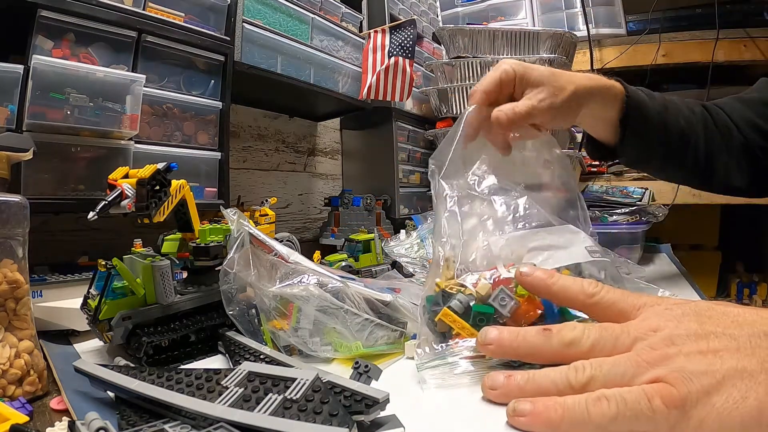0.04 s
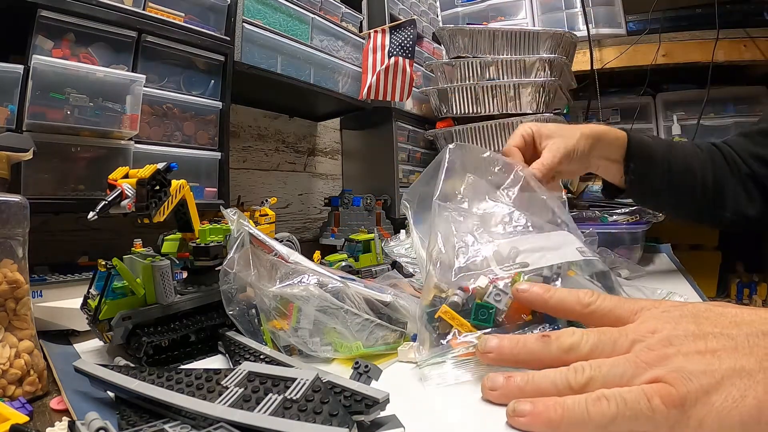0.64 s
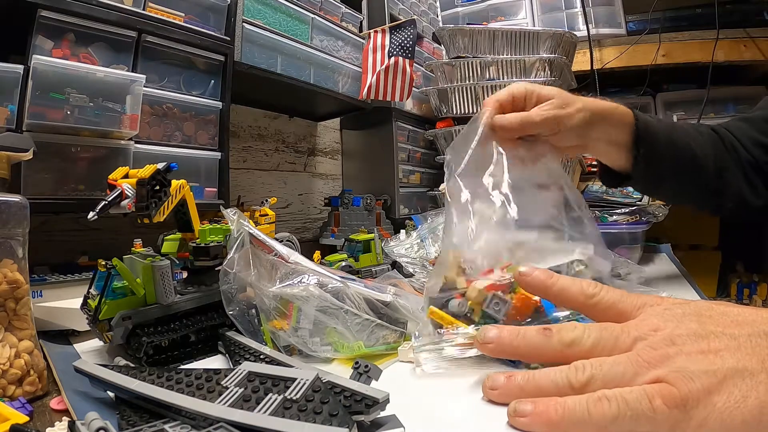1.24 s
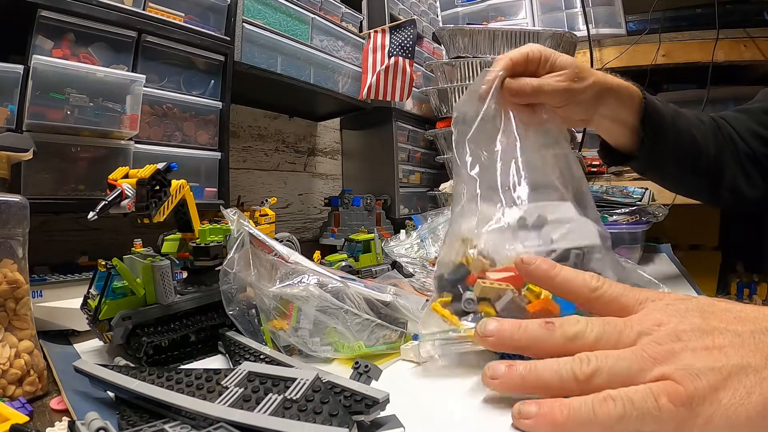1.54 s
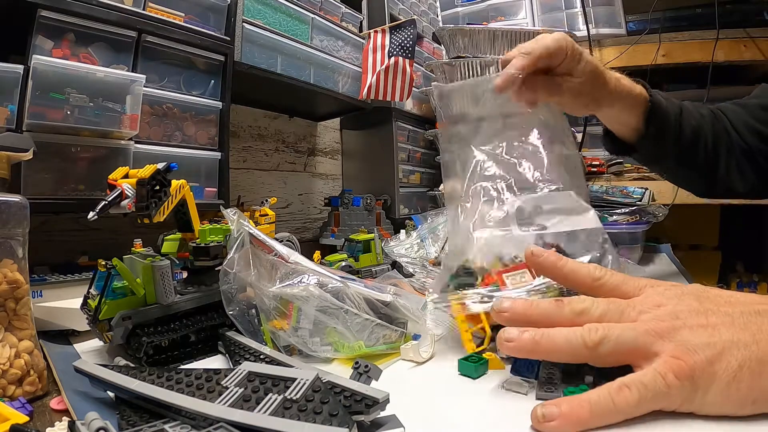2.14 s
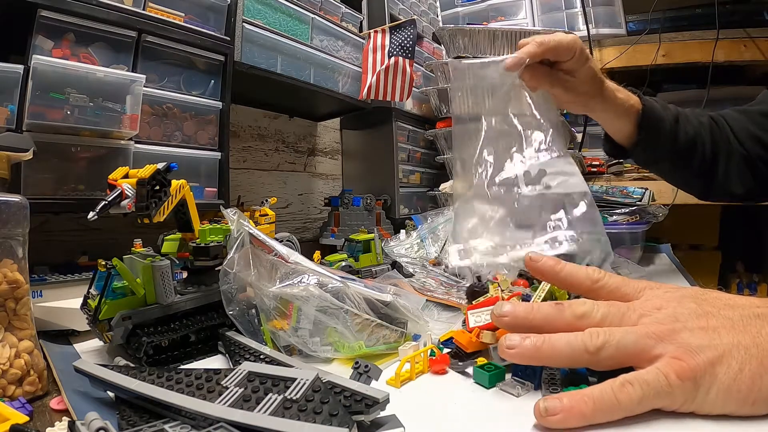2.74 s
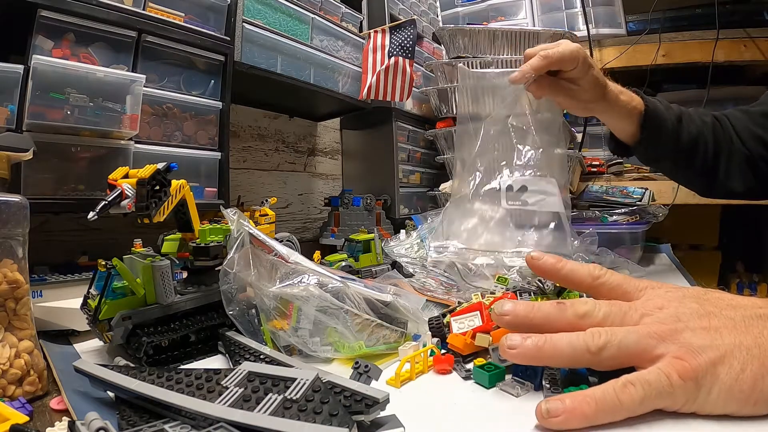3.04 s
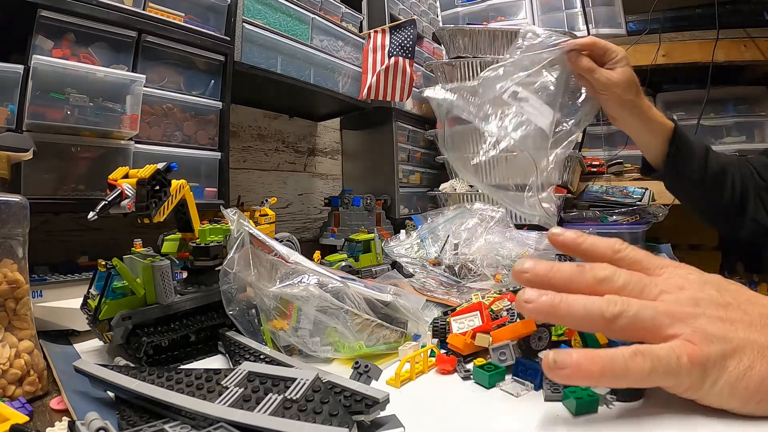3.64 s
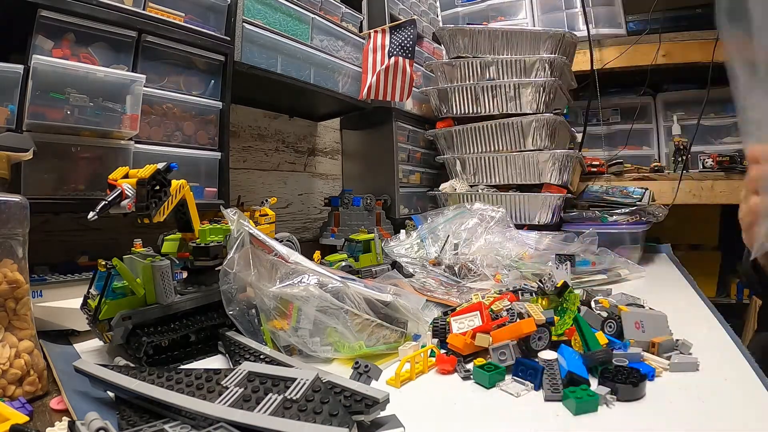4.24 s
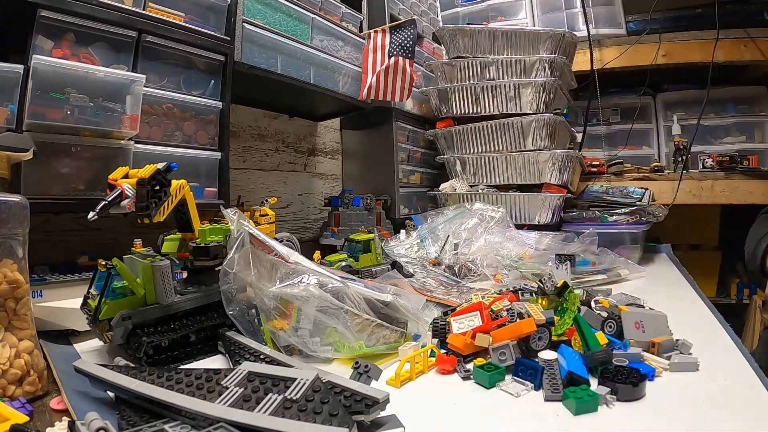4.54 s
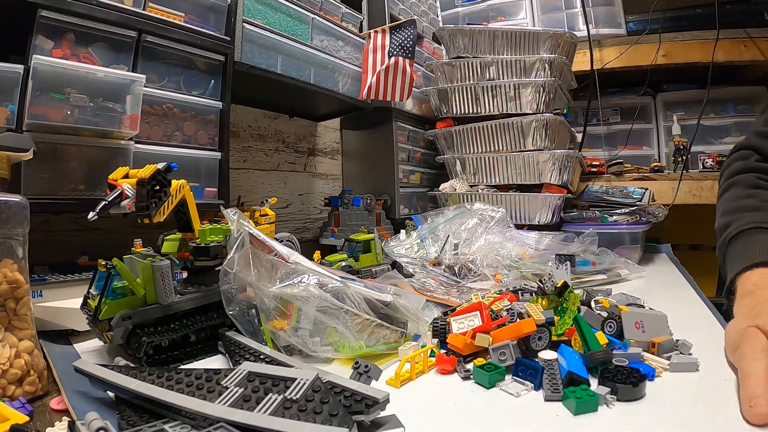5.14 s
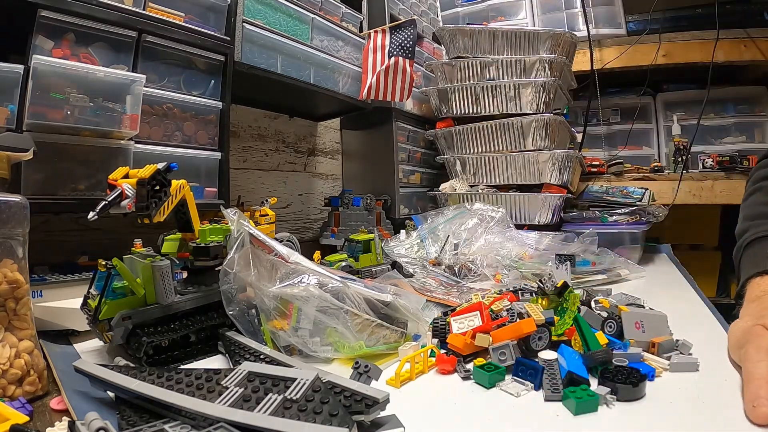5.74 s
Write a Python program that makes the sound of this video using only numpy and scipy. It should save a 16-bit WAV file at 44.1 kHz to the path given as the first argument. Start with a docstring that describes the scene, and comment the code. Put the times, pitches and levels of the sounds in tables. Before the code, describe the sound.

Plastic toy bricks rattle in a bag and clatter onto a tabletop, then the empty bag crinkles and a sleeve slides.

```python
"""Toy bricks shift and click inside a plastic bag, then pour out and clatter onto a tabletop.
Each brick cracks and rings at its wall pitch; the board knocks and rumbles underneath. The empty bag
snaps and crumples as it is put aside, and a sleeved arm slides and bumps along the table.
Stereo microphone close to the table, in a small room crowded with shelves."""
import sys
import numpy as np
from scipy import signal
from scipy.fft import rfft, irfft, next_fast_len
from scipy.io import wavfile
from scipy.ndimage import uniform_filter1d

SR = 44100
rng = np.random.default_rng(int(sys.argv[2]) if len(sys.argv) > 2 else 0)


def store_wav(level_fs):
    """Save 16-bit WAV to argv[1]."""
    pcm = np.round(np.clip(np.atleast_2d(level_fs), -1, 1) * 32767)
    wavfile.write(sys.argv[1], SR, pcm.T.astype(np.int16))


N = 264284
T = np.arange(4096) / SR  # time within one contact


# Tugs on the full bag, clumps shaken out of it, and stray bricks trickling between the clumps:
# t/s, hold/s, clatter level/dB, tabletop/dB re clatter, film/dB re clatter
TUGS = [(0.0, 0.032, -28.5, -8, -4.5), (0.085, 0.038, -29, -5, -8.5), (0.177, 0.05, -35.5, -5, -7.5),
        (0.357, 0.078, -46.5, -3.5, -12), (0.428, 0.042, -34.5, -3, -8.5),
        (0.506, 0.046, -35.5, -3.5, -8.5), (0.606, .0053, -34, 1.5, -14), (0.654, 0.018, -30, -8.5, -19),
        (.715, 0.057, -36, -1, -16), (0.866, 0.054, -38, -2, -29), (0.978, 0.014, -38.5, -2.5, -21),
        (1.023, 0.063, -35.5, -10, -11), (1.169, 0.12, -40, 0.5, -7)]
CLUMPS = [(1.273, 0.043, -27, -5.5, -17), (1.347, 0.045, -24.5, -7.5, -13), (1.416, 0.022, -27, -8, -14),
          (1.52, 0.053, -25.5, -5.5, -9.5), (1.617, 0.034, -30, -6, -17), (1.7, 0.03, -25.5, -5, -18),
          (1.761, 0.042, -29, -3.5, -13.5), (1.87, 0.051, -23.5, -11, -10),
          (1.945, 0.047, -28.5, -7.5, -10.5), (2.055, 0.046, -24, -8.5, -8),
          (2.126, 0.047, -25.5, -4.5, -11.5), (2.194, 0.026, -26.5, -18, -7),
          (2.238, 0.058, -22, -11.5, -7.5), (2.327, 0.041, -27.5, -7, -10),
          (2.405, 0.023, -26.5, -11, -3.5), (2.436, 0.029, -23.5, -9, -7), (2.495, 0.051, -26.5, -6.5, -7),
          (2.598, 0.043, -23.5, -8, -8.5), (2.664, .06, -27.5, -9, -7.5), (2.771, 0.051, -25, -9, -11.5),
          (2.875, 0.021, -28.5, -12.5, -11), (2.947, 0.017, -30.5, -6, -9), (2.972, 0.054, -25, -10, -9),
          (3.058, 0.027, -28, -10, -11), (3.118, 0.082, -30, -9, -11), (3.23, 0.064, -35.5, -10, -13),
          (3.31, .045, -34.5, -5.5, -10), (3.398, 0.032, -39.5, -2, -11)]
TRICKLE = [(1.243, 1.94, -32.5, -5.5, -16.5)]
# Tone of the bricks inside the bag and out in the open: f/Hz, level/dB
BAGGED_TONE = [(880, -54.5), (1500, -10), (2390, -8), (2630, -2), (4230, -8), (4650, -9.5), (5150, -10),
               (7140, -16), (8450, -19), (14000, -38.5)]
LOOSE_TONE = [(940, -13), (1600, -9), (2250, -8), (2500, -3), (2860, -2.5), (3140, -4.5), (3680, -2),
              (4480, -4), (5210, -6.5), (8010, -15), (10100, -21.5), (13000, -28), (15000, -40.5)]
def pour():
    """Close to the microphone, bricks rub in the tugged bag, then spill out and ring more freely."""
    tug_clatter, tug_board, tug_film = swells(TUGS, rise_s=0.023, fall_s=0.045)
    clatter, board, film = swells(CLUMPS + TRICKLE, rise_s=0.012, fall_s=0.036)
    # the heaviest pieces of a clump hit the board first
    first_hits = [(s, 0, db + board_db - 8) for s, _, db, board_db, _ in CLUMPS]
    jolts, = swells(first_hits, rise_s=0.012, fall_s=0.029)
    board = np.hypot(board, jolts)
    inside = heap(tug_clatter, tug_board, tug_film, BAGGED_TONE, hits_per_s=1300, t60=0.03,
                  crack_db=-0.5, film_db=-1.5, crinkles_per_s=900, crinkle_range_db=6)
    spill = heap(clatter, board, film, LOOSE_TONE, hits_per_s=1550, t60=0.036,
                 crack_db=-2.5, film_db=0, crinkles_per_s=1900, crinkle_range_db=2)
    # knocks rumble the board less and less as the load is lifted or the heap cushions them
    weight = tug_board * fade_from(TUGS[0][0], db=-15, db_per_s=15)
    weight += board * fade_from(CLUMPS[0][0], db=-10, db_per_s=8)
    return inside + spill + weight * rumble()


# Tone of a knock on the tabletop and of the film around the bricks: f/Hz, level/dB
KNOCK_TONE = [(60, -40.5), (115, -11), (190, 3), (290, -0.5), (420, 1.5), (700, 1.5), (950, 4), (1300, 3),
              (1700, -2.5), (2400, 0), (4000, -120)]
FILM_TONE = [(40, -12.5), (250, 9.5), (2350, 9), (4000, -49.5), (4660, -34.5), (6400, 6.5), (9360, 4),
             (13000, -9), (15500, -59)]
def heap(clatter, board, film, tone, hits_per_s, t60, crack_db, film_db, crinkles_per_s,
         crinkle_range_db):
    """Bricks strike each other; the same blows knock the tabletop while the film crackles around them."""
    hits = contacts(hits_per_s, range_db=7, flow=clatter)
    bricks = [brick(t60, crack_db) for _ in range(150)]
    spots = [burst(0.035) for _ in range(200)]
    folds = [burst(0.011) for _ in range(60)]
    x = amp(0.1) * clatter * patter(hits, bricks, tone, pan_db=-0.5, width_db=1.5)
    x += board * patter(hits, spots, KNOCK_TONE, pan_db=-2, width_db=3.5)
    crinkles = contacts(crinkles_per_s, crinkle_range_db, flow=film)
    return x + amp(film_db) * film * patter(crinkles, folds, FILM_TONE, pan_db=-3, width_db=7)


# Wall pitches of the common brick sizes: f/Hz
WALL_PITCHES = [2137, 2500, 2602, 2765, 3070, 3150, 3460, 3888, 4410, 4610]
def brick(t60, crack_db):
    """One brick: a sharp crack, its wall mode and five scattered modes, the high ones dying sooner."""
    wall_hz = rng.choice(WALL_PITCHES) * np.exp(0.035 * rng.standard_normal())
    hz = np.append(wall_hz, rng.uniform(1800, 14000, 5))
    mode_t60 = t60 * np.exp(0.3 * rng.standard_normal(len(hz))) * (3000 / hz) ** 0.3
    shell = ring(np.column_stack([hz, rng.normal(0, 4.5, len(hz)), mode_t60]))
    return unit(shell) + amp(crack_db) * unit(burst(0.0066))


# Single hard brick contacts: t/s, crack peak/dB, f/Hz, ring peak/dB
CLACKS = [(0.009, -20, 3144, -17), (0.532, -14, 2680, -24), (0.653, -23, 2930, -20.5),
          (.662, -25, 3040, -19), (0.715, -30, 2560, -24), (.749, -26, 1895, -25), (.756, -25.5, 3110, -24),
          (.835, -23.5, 3060, -29.5), (0.8618, -27, 2760, -30), (1.1705, -21, 2670, -27),
          (1.276, -20.5, 2530, -17), (1.331, -25.5, 6700, -26.5), (1.35, -20, 3930, -19),
          (1.365, -15.5, 2170, -17), (1.398, -15.5, 4479, -20.5), (1.464, -13, 4130, -17),
          (1.47, -17.5, 2960, -17), (1.488, -22, 4490, -13.5), (1.5103, -17.5, 4393, -20),
          (1.567, -18.5, 2830, -20.5), (1.596, -21, 5470, -17.5), (1.627, -23.5, 7430, -25.5),
          (1.713, -14, 4651, -22), (1.749, -23, 8096, -24.5), (1.864, -16, 4080, -22),
          (1.872, -21, 3876, -16), (1.892, -16, 2530, -19), (1.914, -21, 4660, -15),
          (1.958, -17, 3830, -22.5), (2.0324, -11, 3600, -21), (2.075, -17, 4307, -23),
          (2.096, -16.5, 3962, -16.5), (2.122, -20, 2326, -25.5), (2.16, -15, 2730, -19.5),
          (2.164, -19, 6977, -23), (2.24, -18, 2340, -21), (2.294, -23.5, 3400, -15.5),
          (2.301, -24, 3400, -12.5), (2.327, -13.5, 3230, -14), (2.333, -19, 3200, -14.5),
          (2.362, -16, 2480, -18.5), (2.408, -17.5, 4630, -20), (2.44, -17, 2540, -17.5),
          (2.463, -18, 3200, -13.5), (2.509, -14, 3160, -16), (2.518, -14.5, 2490, -19),
          (2.545, -21, 4500, -22), (2.5773, -9, 2650, -21.5), (2.639, -13.5, 3930, -20.5),
          (2.7, -18, 4400, -21), (2.726, -21.5, 2498, -22.5), (2.754, -12.5, 4730, -18),
          (2.76, -18.5, 2540, -19), (2.777, -20, 4737, -21.5), (2.789, -17.5, 2440, -19),
          (2.872, -17.5, 2570, -21), (2.894, -24.5, 3150, -19), (2.939, -14, 2630, -28.5),
          (2.978, -15, 2326, -18), (3.028, -19.5, 4670, -21), (3.084, -19, 3120, -23),
          (3.111, -16, 2584, -22), (3.129, -16.5, 3240, -21), (3.179, -19.5, 2646, -17.5),
          (3.183, -22, 3150, -17.5), (3.257, -27.5, 2460, -24.5), (3.304, -25, 2498, -25.5),
          (3.321, -19.5, 2720, -22.5)]
# Tone of the crack of plastic on plastic: f/Hz, level/dB
CRACK_TONE = [(300, -15), (1200, -7.5), (2400, -0.5), (4400, -4), (6000, -13.5), (9000, -12),
              (15000, -37.5)]
def clacks(t60=0.04, rebound_s=0.0076, rebound_db=-7):
    """The hardest contacts stand out: a dry crack and a ring that repeats as the brick rebounds."""
    x = np.zeros((2, N))
    for s, crack_db, hz, ring_db in CLACKS:
        lower, upper, top = hz * rng.uniform([0.62, 1.1, 1.7], [0.93, 1.5, 2.3])
        modes = [(hz, 0, t60), (lower, -9, t60 * 0.42), (upper, -11, t60 * 0.5), (top, -19, t60 * 0.5)]
        shell = crest(ring(modes))
        add(x, s, amp(crack_db) * crest(colour(scuff(0.0019), CRACK_TONE)))
        add(x, s, amp(ring_db) * shell)
        add(x, s + rebound_s * rng.uniform(0.6, 1.1), amp(ring_db + rebound_db) * shell)
    return x


# One brick's double click: t/s, peak/dB
DOUBLE_CLICK = [(1.003, -14), (1.006, -18)]
# Its free modes: f/Hz, relative level/dB, t60/s
BRICK_MODES = [(2300, -5, 0.03), (2520, -3, 0.04), (3320, -18, .1), (4646, 0, .042), (5512, -10, 0.04),
               (7130, 0, .026), (8190, -7, .04)]
def slipping_brick():
    """One brick slips off an edge, clicks twice and rings freely."""
    x = np.zeros((2, N))
    for s, db in DOUBLE_CLICK:
        add(x, s, amp(db) * crest(colour(scuff(0.0027), CRACK_TONE)))
        add(x, s + 0.0015, amp(db) * crest(ring(BRICK_MODES)))
    return x


# Weight leaning on the table: t/s, hold/s, relative level/dB
LEANS = [(.03, 0.11, -41), (.58, 0.15, -49), (1.0, 0.0146, -46), (1.228, 0.022, -37), (1.725, 0.011, -40),
         (1.886, 0.019, -34), (3.575, 0.043, -49.5), (4.15, 0.13, -57), (4.36, 0.16, -54),
         (4.94, 0.073, -65), (5.108, 0.051, -36.5), (5.22, 0.11, -54.5), (5.355, 0.12, -40),
         (5.91, .015, -49)]
# Things landing on the board: t/s, thud peak/dB, f/Hz, knock peak/dB
LANDINGS = [(.611, -35, 700, -36), (0.993, -31, 400, -24), (1.14, -35, 200, -42), (1.217, -36, 900, -22),
            (1.228, -21.5, 111, -16.5), (1.242, -30.5, 110, -17.5), (1.364, -22, 280, -26),
            (1.454, -22, 199, -18), (1.624, -26, 130, -15.5), (1.686, -23.5, 1000, -20.5),
            (1.723, -19.5, 1200, -23.5), (1.728, -24.5, 120, -32), (1.787, -34, 135, -17),
            (1.799, -31, 1050, -15.5), (1.86, -23, 220, -36), (1.886, -17, 65, -24.5),
            (1.976, -25.5, 400, -23), (2.047, -19.5, 850, -21.5), (2.162, -22, 900, -24.5),
            (2.246, -24, 200, -17.5), (2.429, -21.5, 850, -24.5), (2.98, -22.5, 410, -25),
            (3.341, -34, 900, -30), (3.61, -36, 200, -34), (3.629, -55, 300, -29), (4.35, -30.5, 350, -44),
            (4.465, -39, 600, -33)]
# Tone of the board's dense modes in a thud: f/Hz, level/dB
THUD_TONE = [(25, -15), (70, -9), (170, 6), (300, -3.5), (1100, -2), (2000, -23.5), (6000, -76.5),
             (10000, -120)]
def table():
    """The board rumbles under weight; things thud onto it, each spot with its own pitch."""
    weight, = swells(LEANS, rise_s=0.012, fall_s=0.022)
    x = amp(-5.5) * weight * rumble()
    for s, thud_db, hz, knock_db in LANDINGS:
        main_mode = ring([(hz, 0, 0.039 * (200 / hz) ** 0.11)])
        dense_modes = amp(-3) * crest(colour(burst(0.069), THUD_TONE))
        add(x, s, amp(thud_db) * crest(main_mode + dense_modes))
        add(x, s, amp(knock_db) * crest(colour(burst(0.041), KNOCK_TONE)))  # hard corners also knock
    return x


# Tone of the board's rumble: f/Hz, level/dB
RUMBLE_TONE = [(15, -30), (35, -4), (75, -0.5), (125, -3), (170, -7.5), (230, -22.5), (400, -63.5),
               (800, -120)]
def rumble():
    """The board's low murmur under shifting weight, at an even strength of about 1."""
    hits = contacts(rate=320, range_db=1)
    return patter(hits, [burst(0.027) for _ in range(80)], RUMBLE_TONE, pan_db=-0.5, width_db=3.5)


# The empty bag is squeezed, and rustles as it is carried and relaxes:
# t/s, hold/s, crumple level/dB, crackle/dB re crumple
SQUEEZES = [(3.495, 0.031, -41.5, -10), (3.565, 0.02, -35, -6.5), (3.735, 0.018, -57.5, -16),
            (3.828, 0.0062, -52, -2.5), (4.152, 0.042, -36.5, -2), (4.218, .005, -42, -5.5),
            (4.355, 0.028, -43.5, -2.5), (4.43, 0.045, -36, -7)]
RUSTLES = [(3.885, 0.053, -58, 0), (3.998, .085, -58.5, 1.5), (4.2, 0.098, -52, 0.5),
           (4.696, 0.21, -70.5, 2.5)]
# Creases flipping over: t/s, peak/dB, f/Hz, treble at 6.5 kHz/dB
SNAPS = [(0.047, -26, 3400, 1), (.108, -19, 2750, -12), (.181, -17.5, 1290, 5.5), (.276, -23.5, 3440, -4),
         (0.311, -28.5, 1350, -27), (.356, -32.5, 3000, 3), (.457, -18, 3670, -4), (.638, -11.5, 2950, -34),
         (.893, -25.5, 716, -19), (0.969, -28.5, 4020, -3), (1.068, -24.5, 8200, 6.5),
         (3.389, -22.5, 3430, 16), (3.4934, -20, 4180, 1.5), (3.524, -29, 1065, -12),
         (3.535, -21, 1520, 4.5), (3.562, -30, 1300, 10), (3.578, -19.5, 985, 5), (3.587, -32, 1100, -14),
         (3.684, -41.5, 2300, -20), (3.719, -32.5, 2970, -6.5), (3.733, -36, 1030, -24),
         (3.744, -36, 2830, -27), (3.793, -43, 1000, -16), (3.861, -36, 764, -5), (3.888, -40, 3500, -6),
         (3.903, -25, 2980, -1.5), (3.965, -36, 4450, 3), (3.982, -24, 4030, 5), (4.027, -26, 2120, 15),
         (4.059, -29.5, 2650, 14), (4.097, -25, 1130, 1.5), (4.112, -35, 1010, -9), (4.148, -20, 755, -2),
         (4.166, -23.5, 570, 0), (4.191, -20.5, 4270, 5), (4.334, -37, 1100, -20), (4.375, -33, 1300, 17),
         (4.4, -24.5, 990, -3), (4.425, -24, 1100, 9), (4.477, -25.5, 1520, -33), (4.525, -39.5, 1490, -36),
         (4.586, -35.5, 1800, -28), (4.598, -38.5, 970, -24), (4.636, -39, 2460, -26),
         (4.664, -36.5, 1590, -14), (4.676, -38, 1550, 8), (4.74, -40, 1410, -21), (4.762, -43.5, 920, 23),
         (4.813, -44.5, 960, -21)]
# Tone of the dull crumple, the fine crackle and a snapping crease: f/Hz, level/dB
CRUMPLE_TONE = [(76, -23), (130, -17), (189, 4), (246, -6.5), (377, 0.5), (543, -6), (655, -1.5),
                (1000, -1), (2600, -11.5), (3380, -18), (5720, -120)]
CRACKLE_TONE = [(1180, -34), (2000, -3.5), (2590, -43), (2790, -7), (4110, -8.5), (6040, -17),
                (8960, -22.5), (12300, -32), (15500, -45)]
CREASE_TONE = [(80, -20), (300, -0.5), (1500, 2), (4300, 3), (6000, -9), (9000, -8.5), (15000, -47)]
def bag():
    """Slack film buckles in dull crumples and fine crackles; single creases snap and leave it quivering."""
    handling = swells(SQUEEZES + RUSTLES, rise_s=0.016, fall_s=0.02)
    quiver = swells([(s, 0, db - 21.5) for s, db, _, _ in SNAPS], rise_s=0.001, fall_s=0.0099)
    crumple, crackle = np.hypot(handling, quiver)
    hits = contacts(rate=700, range_db=6.5, flow=crumple > amp(-110))
    buckles = [burst(0.053) for _ in range(80)]
    ticks = [burst(0.008) for _ in range(80)]
    x = crumple * patter(hits, buckles, CRUMPLE_TONE, pan_db=-1.5, width_db=-1)
    x += amp(-0.5) * crackle * patter(hits, ticks, CRACKLE_TONE, pan_db=-0.5, width_db=5.5)
    for s, db, hz, treble_db in SNAPS:
        snap = crest(colour(scuff(0.0031), CREASE_TONE)) + 0.73 * ring([(hz, 0, 0.016)])
        add(x, s, amp(db) * crest(colour(snap, [(2500, 0), (6500, treble_db)])))
    return x


# The arm slides along the table: t/s, hold/s, relative scrape level/dB, drag offset/dB
SLIDES = [(4.955, 0.14, -59.5, 8.5), (5.1, 0.028, -44.5, -2), (5.262, 0.0046, -58.5, 3.5),
          (5.36, 0.038, -73.5, 15), (5.455, 0.018, -60.5, 5.5), (5.552, 0.038, -46.5, -13),
          (5.625, 0.041, -55, -4), (5.7, 0.032, -53, -15), (5.81, 0.041, -61, -3), (5.91, .008, -67, 13.5),
          (5.958, 0.007, -65, 17)]
# The sleeve catches and jerks free: t/s, relative peak/dB
CATCHES = [(4.998, -40.5), (5.096, -38), (5.121, -36), (5.145, -32), (5.524, -41), (5.54, -43),
           (5.802, -48)]
# The sleeve sticks and sings briefly: t/s, length/s, start f/Hz, end f/Hz, level/dB
RUBS = [(5.538, .055, 1155, 1300, -46), (5.602, 0.02, 8320, 8430, -51), (5.609, 0.06, 8350, 8320, -66),
        (5.682, 0.07, 8400, 8400, -67), (5.657, .085, 956, 1146, -50), (5.686, 0.058, 2810, 2920, -53),
        (5.789, .04, 1402, 1050, -55), (5.802, .065, 981, 740, -53)]
# Tone of the scraping sleeve and of the board under the dragging arm: f/Hz, level/dB
SLEEVE_TONE = [(210, -43), (350, 0.5), (499, -10.5), (556, -6.5), (1400, -2.5), (1940, -3.5), (2900, -3.5),
               (7320, -13.5), (8280, -20), (9370, -22), (14000, -38)]
DRAG_TONE = [(60, -36), (120, -9), (180, 0.5), (300, 2), (420, -11.5), (800, -44), (2000, -120)]
def arm():
    """A little left of the microphone, cloth slips on the table's edge; the board murmurs under the arm."""
    scrape, drag = swells(SLIDES, rise_s=0.016, fall_s=0.016)
    slips = contacts(rate=2000, range_db=12, flow=drag > amp(-110))
    fibres = [burst(0.01045) for _ in range(80)]
    x = amp(-1) * scrape * patter(slips, fibres, SLEEVE_TONE, pan_db=3.5, width_db=7.5, lag=0)
    for s, db in CATCHES:
        add(x, s, amp(db - 0.5) * crest(colour(burst(0.1), SLEEVE_TONE)), pan_db=3, lag=0)
    for s, length_s, start_hz, end_hz, db in RUBS:
        add(x, s, amp(db) * rub(length_s, start_hz, end_hz), pan_db=5, lag=0)
    return x + amp(-3) * drag * patter(slips, fibres, DRAG_TONE, pan_db=-3, width_db=1, lag=0)


def rub(length_s, start_hz, end_hz, t60=0.0036):
    """Friction excites a narrow resonance that swells, glides and fades."""
    progress = np.linspace(0, 1, int(length_s * SR))
    grip = rng.standard_normal((2, len(progress) + len(T) - 1))
    decay = T * amp(-60 * T / t60)
    cos_gain, sin_gain = signal.fftconvolve(grip, decay[None], "valid", axes=1)
    phase = 2 * np.pi * np.cumsum(start_hz + (end_hz - start_hz) * progress) / SR
    return np.sin(np.pi * progress) * unit(cos_gain * np.cos(phase) + sin_gain * np.sin(phase))


# Decay of the small room: f/Hz, t60/s
ROOM_DECAY = [(150, 0.082), (1000, 0.11), (4000, 0.34), (12000, 0.015)]
def room(x, shelves_db, tail_db, shelves_t60, hop=9000):
    """Nearby shelves scatter the sound and a short tail follows; the paths change as the sources move."""
    crossfade = np.sin(np.pi * np.arange(2 * hop) / (2 * hop))
    delay = round(0.0016 * SR)
    padded = np.pad(x, ((0, 0), (hop, SR)))
    out = padded.copy()
    for start in range(0, N + hop, hop):  # fresh random paths for each overlapping block
        hz, t, bands = signal.stft(diffuse(SR // 4), SR, nperseg=256)
        decay = amp(-60 * t / along(ROOM_DECAY, hz)[:, None])
        tail = signal.istft(bands * decay, SR, nperseg=256)[1]
        shelves = diffuse(len(T)) * amp(-60 * T / shelves_t60)
        paths = amp(tail_db) * tail / np.linalg.norm(tail[0])
        paths[:, :len(T)] += amp(shelves_db) * shelves / np.linalg.norm(shelves[0])
        echoes = signal.fftconvolve(crossfade * padded[:, start:start + 2 * hop], paths, axes=1)
        out[:, start + delay:][:, :echoes.shape[1]] += echoes
    return out[:, hop:hop + N]


# Room tone at the microphone: f/Hz, level/dB
AIR_TONE = [(15, -25.5), (25, -22.5), (90, -6.5), (237, 4), (373, 1), (558, -6.5), (1350, -1.5),
            (1670, -13), (6900, -25.5), (12100, -34.5), (15000, -58)]
def room_tone():
    """A faint, steady, low hush from all around."""
    return amp(-61.5) * unit(colour(diffuse(N), AIR_TONE))


def diffuse(size):
    """Noise from all sides: alike at both capsules in the bass, largely unrelated in the treble."""
    mid, side = rng.standard_normal((2, size))
    side = colour(side, [(100, -7.5), (700, -5), (3000, 1.5)])
    return np.array([mid + side, mid - side])


def swells(rows, rise_s, fall_s):
    """Gestures rise, hold and die away: one gain curve per level column, later ones re the first."""
    s, hold, db, *offsets = np.transpose(rows)[..., None]
    t = np.arange(0, N, 32) / SR
    shape = np.exp(-np.maximum(s - t, 0) / rise_s - np.maximum(t - s - hold, 0) / fall_s)
    curves = [np.linalg.norm(amp(db + offset) * shape, axis=0) for offset in [0] + offsets]
    return [np.interp(np.arange(N) / SR, t, curve) for curve in curves]


def fade_from(start_s, db, db_per_s):
    """A gain that holds at db, then falls steadily from start_s."""
    return amp(db - db_per_s * np.maximum(np.arange(N) / SR - start_s, 0))


def contacts(rate, range_db, flow=None, count=14000):
    """Random contacts, rate a second at full flow: t/s, gain, which piece (0-1), place across the table."""
    when, chance, piece, softness = rng.random((count, 4)).T
    place = rng.standard_normal(count)
    if flow is not None:  # a stronger flow is also a denser one
        rate = rate * np.sqrt(flow[(when * N).astype(int)] / flow.max())
    rows = np.column_stack([when * N / SR, amp(-range_db * softness), piece, place])
    return rows[chance < rate * N / SR / count]


def patter(hits, voices, tone, pan_db, width_db, lag=1.7):
    """Each contact sounds one of the voices from its own place; the stream is evened to about rms 1."""
    x = np.zeros((2, N))
    for s, gain, piece, place in hits:
        voice = voices[int(piece * len(voices))]
        add(x, s, gain * voice, pan_db + width_db * place, round(lag + 0.7 * place))
    x = colour(x, tone)
    power = np.mean(x ** 2, axis=0)
    power = np.abs(uniform_filter1d(uniform_filter1d(power, size=1500), size=1500))
    return x / np.sqrt(power + 1e-3 * power.mean())


def ring(modes):
    """Damped sines of random polarity from rows of f/Hz, level/dB, t60/s."""
    hz, db, t60 = np.transpose(modes)[..., None]
    polarity = rng.choice([-1, 1], hz.shape)
    return np.sum(polarity * amp(db - 60 * T / t60) * np.sin(2 * np.pi * hz * T), axis=0)


def burst(t60):
    """A crowd of heavily damped modes: noise that dies in t60 seconds."""
    return rng.standard_normal(len(T)) * amp(-60 * T / t60)


def scuff(length_s):
    """Noise that runs for a few milliseconds, then stops dead."""
    return rng.standard_normal(len(T)) / (1 + (T / length_s) ** 4)


def add(track, s, wave, pan_db=-1.5, lag=2):
    """Place a sound at time s; the left capsule hears it pan_db louder and lag samples later."""
    for side, sign, late in zip(track, (1, -1), (lag, 0)):
        part = side[max(0, round(s * SR) + late):][:len(wave)]
        part += amp(sign * pan_db / 2) * wave[:len(part)]


def colour(x, tone, size=4096):
    """Minimum-phase filter shaped by points of f/Hz, level/dB."""
    gain = amp(along(tone, np.fft.rfftfreq(size, 1 / SR)))
    cepstrum = irfft(np.log(gain + 1e-6))
    cepstrum[1:size // 2] *= 2
    cepstrum[size // 2 + 1:] = 0
    impulse = irfft(np.exp(rfft(cepstrum)))
    m = next_fast_len(x.shape[-1] + size)
    return irfft(rfft(x, m) * rfft(impulse, m), m)[..., :x.shape[-1]]


def along(points, hz):
    """Interpolate points of f/Hz, value on a log frequency axis."""
    f, values = np.transpose(points)
    return np.interp(np.log(hz + 1), np.log(f + 1), values)


def amp(db):
    """Decibels to gain."""
    return 10 ** (np.asarray(db) / 20)


def unit(x):
    """Scale to rms 1."""
    return x / np.sqrt(np.mean(x ** 2) + 1e-20)


def crest(x):
    """Scale to peak 1."""
    return x / np.abs(x).max()


def scene():
    """Bricks, table, bag and arm at close range in the quiet room."""
    air = room_tone()
    direct = pour() + clacks() + slipping_brick() + table() + bag() + arm()
    return room(direct, shelves_db=-9, tail_db=-14, shelves_t60=0.045) + air


def record(dry):
    """The microphone chain passes nothing above 15.7 kHz."""
    m = next_fast_len(N + SR // 2)
    passband = np.fft.rfftfreq(m, 1 / SR) < 15700
    return irfft(rfft(dry, m) * passband, m)[:, :N]


dry = scene()
out = record(dry)
store_wav(out)
```